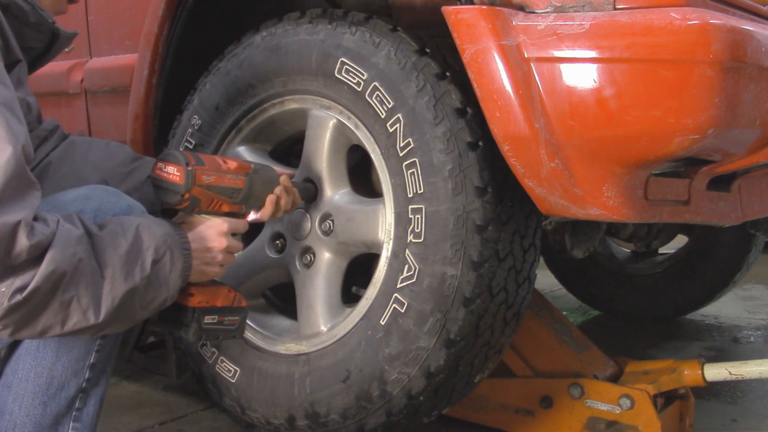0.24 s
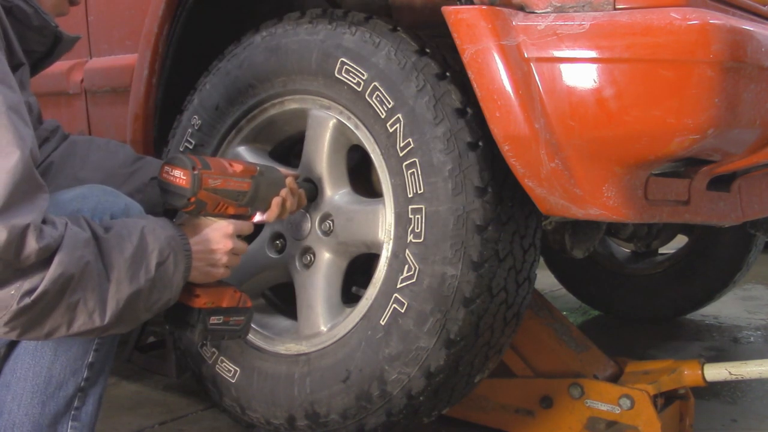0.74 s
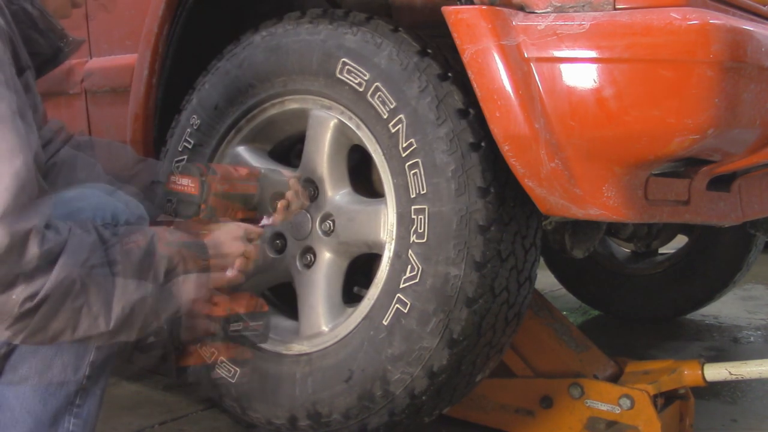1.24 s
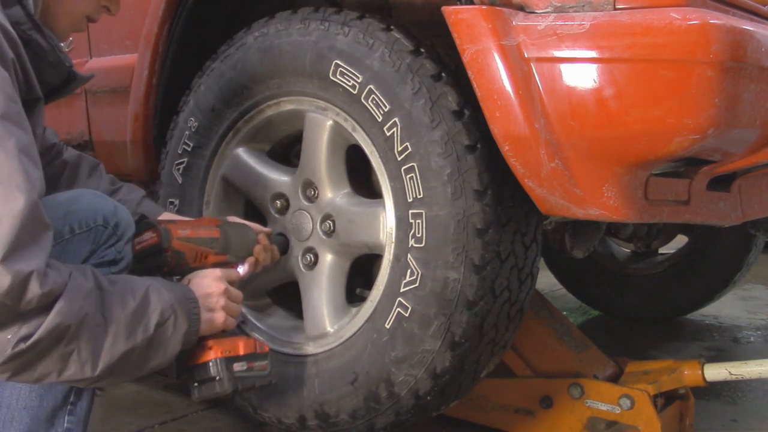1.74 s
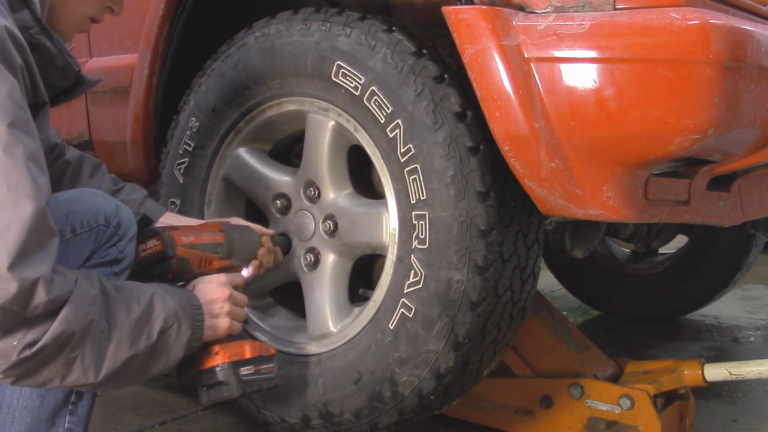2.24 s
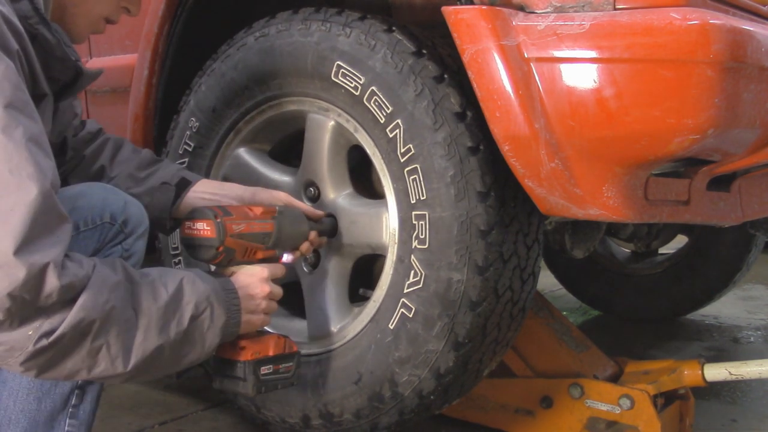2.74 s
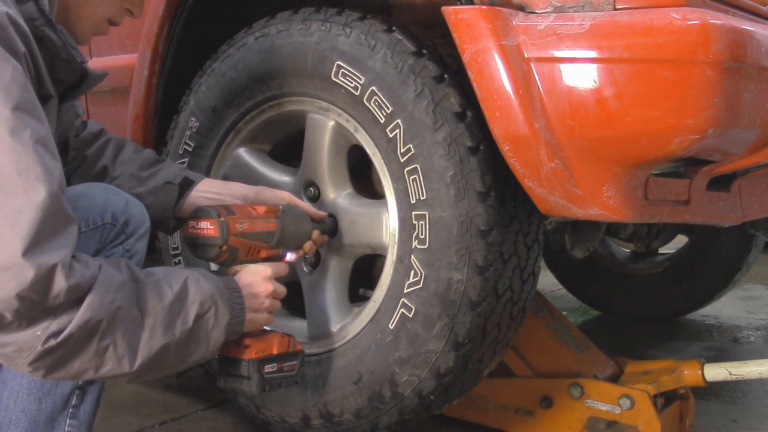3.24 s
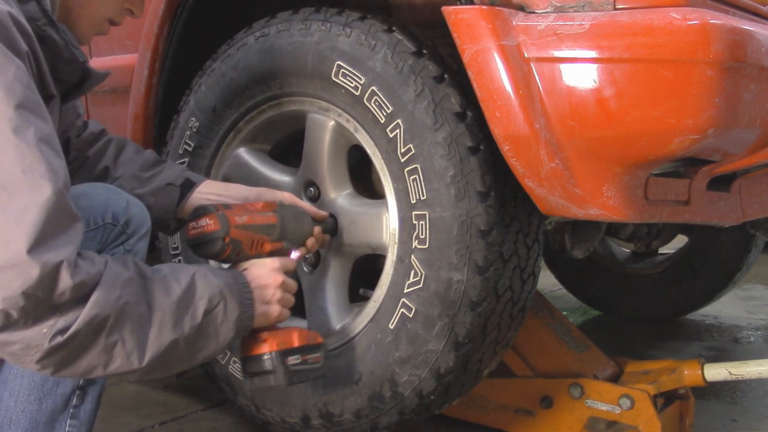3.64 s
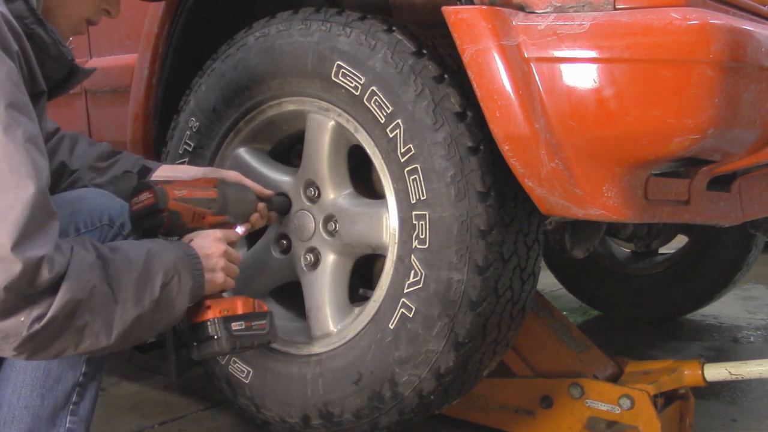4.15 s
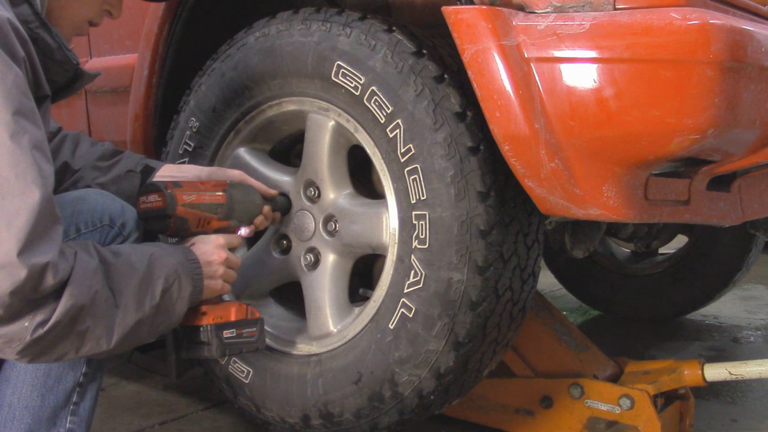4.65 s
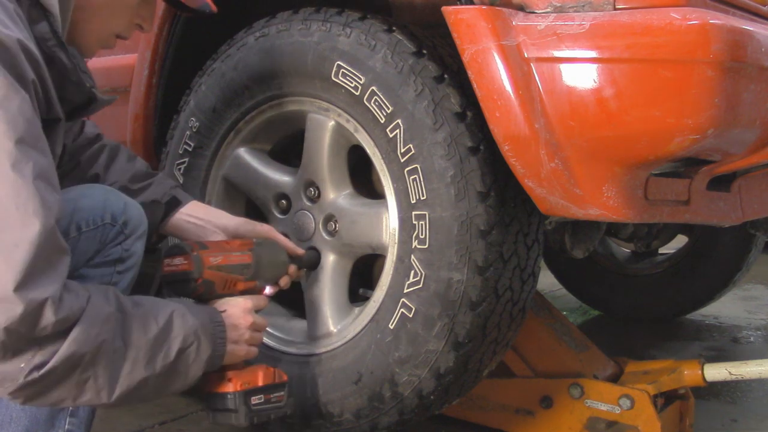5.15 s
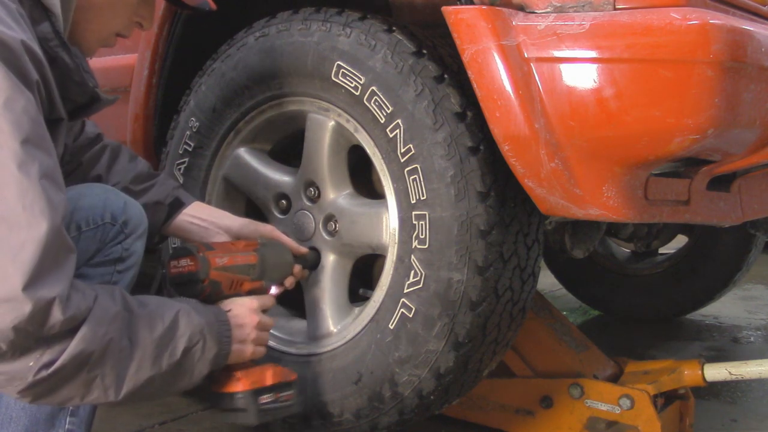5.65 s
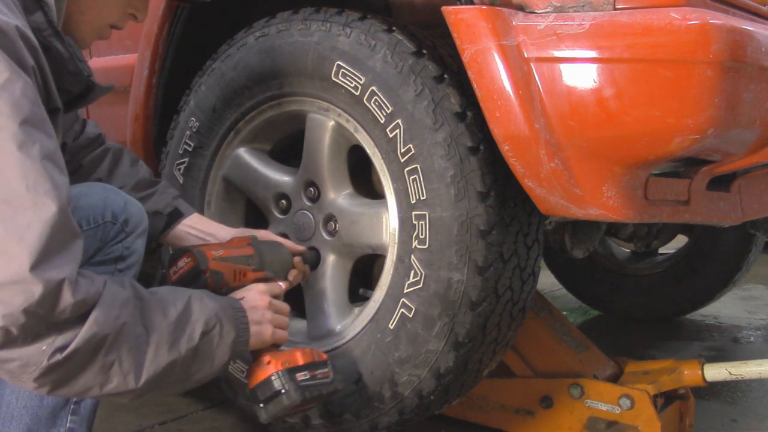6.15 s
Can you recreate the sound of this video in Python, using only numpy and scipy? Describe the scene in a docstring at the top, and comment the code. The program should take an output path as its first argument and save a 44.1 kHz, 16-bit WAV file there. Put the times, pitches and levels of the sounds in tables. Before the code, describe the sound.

In a reverberant garage, a cordless impact wrench runs close to the microphone in short pulls. Its rattling gear whine rises and drops with a thin high electronic whistle, then the hammer cracks several uneven steel blows as each lug nut seats. Dull bumps against the wheel fall between pulls. The blows are loud and slightly squashed, with the room's ring swelling up behind them.

```python
"""The hush of a hard-walled garage and the dying ring of an earlier burst come first, then a cordless impact wrench
spins lug nuts onto a wheel in short pulls of the trigger. Its gears whine and rattle with motor speed, the speed
controller whistles near 10 kHz, and the hammer strikes a few uneven blows as each nut seats: puffs of noise through
steel resonances. Direct sound and garage reflections meet at the microphone, and the recorder's limiter ducks the
blows, so the garage's ring swells up behind each burst."""
import sys
import numpy as np
from scipy import signal
from scipy.fft import rfft, irfft
from scipy.io import wavfile
from scipy.ndimage import uniform_filter1d

SR = 44100
rng = np.random.default_rng(int(sys.argv[2]) if len(sys.argv) > 2 else 0)


def materialize(psi):
    """Save the field psi as 16-bit PCM at rate SR to the path in sys.argv[1].

    A 1-D psi becomes a single channel; in a 2-D psi each row is a channel.
    """
    bounded = np.clip(np.atleast_2d(psi).T, -1, 1)
    quanta = np.round(bounded * 32767).astype(np.int16)
    wavfile.write(sys.argv[1], SR, quanta)


N = 282227
SECONDS = np.arange(N) / SR

# hammer blows on the anvil: (time [s], strength [dB])
BLOWS = [(1.079, -9), (1.092, -7), (1.108, 1), (1.166, -7), (1.202, -0.5), (1.236, -0.5), (2.303, -10),
         (2.309, -8), (2.345, 3.5), (2.368, -4.5), (2.398, 0.5), (2.430, 6), (2.458, 1), (3.677, 1),
         (3.709, -0.5), (3.737, 7), (4.196, 2.5), (4.219, -2), (4.236, 5.5), (4.741, 3), (4.755, 5),
         (4.798, 4), (4.810, 10), (4.867, 9), (5.603, -5), (5.617, 9), (5.923, -14), (5.928, -15),
         (5.957, 8.5)]
# colour of anvil, socket and wheel: (frequency [Hz], relative power density [dB])
STEEL_SPECTRUM = [(88, -56.5), (150, -15), (253, -23), (339, -11), (471, -12), (583, -6.5), (643, -7),
                  (1130, -4.5), (1290, -5.5), (2100, -1), (3280, -2.5), (4480, -6.5), (7860, -8.5),
                  (15500, -29)]
# dull colour of nut, thread and shaken wheel: (frequency [Hz], relative power density [dB])
THREAD_SPECTRUM = [(50, 3), (90, 0.5), (170, 8.5), (300, 1.5), (700, -3.5), (1500, -46.5)]


def from_db(db):
    """Decibels to amplitude gain."""
    return 10 ** (np.asarray(db) / 20)


def rms_one(x):
    """The same signal at rms 1."""
    return x / np.sqrt(np.mean(x ** 2) + 1e-20)


def in_time(rows):
    """Each column of a curve, interpolated at every sample."""
    s, *columns = np.transpose(rows)
    return [np.interp(SECONDS, s, c) for c in columns]


def at_hz(points, hz):
    """A table read on a log-frequency axis."""
    f, value = np.transpose(points)
    return np.interp(np.log(np.maximum(hz, 1)), np.log(f), value)


def drift(rate_hz):
    """Slow random wander of spread 1: noise through a two-pole low-pass, made at every 20th sample."""
    r = np.exp(-40 * np.pi * rate_hz / SR)
    noise = rng.standard_normal(N // 20 + 2002)
    slow = signal.lfilter([1], [1, -2 * r, r * r], noise)[2000:]   # drop the settling
    return np.interp(np.arange(N) / 20, np.arange(len(slow)), rms_one(slow))


def coloured(x, spectrum):
    """Causal (minimum-phase) filter with the given spectrum and unit power gain."""
    size = 4096
    gain = rms_one(from_db(at_hz(spectrum, np.arange(size // 2 + 1) * SR / size)))
    # folding the cepstrum forward in time gives minimum phase
    cepstrum = irfft(np.log(gain))
    cepstrum[1:size // 2] *= 2
    cepstrum[size // 2 + 1:] = 0
    impulse = irfft(np.exp(rfft(cepstrum)))
    return signal.oaconvolve(x, impulse)[:N]


def noise_of(spectrum):
    """Steady noise of the given colour."""
    return coloured(rng.standard_normal(N), spectrum)


def resonate(x, modes):
    """Adds a body's resonances to the sound passing through it."""
    out = x
    for hz, width_hz, db in modes:
        r = np.exp(-np.pi * width_hz / SR)
        zeros = [(1 - r * r) / 2, 0, (r * r - 1) / 2]
        poles = [1, -2 * r * np.cos(2 * np.pi * hz / SR), r * r]
        out = out + from_db(db) * signal.lfilter(zeros, poles, x + 1e-18)
    return out


def kicks(rows):
    """One sharp push for each (time [s], strength [dB]) row."""
    out = np.full(N, 1e-18)
    for s, db in rows:
        out[int(s * SR)] += from_db(db)
    return out


def bursts(rows, decay_s):
    """A dying puff of noise for each (time [s], strength [dB]) row."""
    envelope = signal.lfilter([1], [1, -np.exp(-1 / (decay_s * SR))], kicks(rows))
    return envelope * rng.standard_normal(N)


def steel(x):
    """Anvil, socket and wheel colour what passes through them, with their own resonances on top."""
    # resonances of socket, wheel and tyre cavity: (frequency [Hz], width [Hz], gain over surroundings [dB])
    socket_modes = [(201.6, 12, 10.5), (2550, 420, -16), (4440, 550, -4), (4760, 460, -1.5),
                    (5240, 460, -3.5), (7020, 1000, -1.5)]
    return resonate(coloured(x, STEEL_SPECTRUM), socket_modes)


def background():
    """The garage's steady hush, and the last of an earlier burst's ring, falling at a constant dB rate."""
    # the hush: (frequency [Hz], relative power density [dB])
    hush_spectrum = [(20, -7), (45, -6.5), (58, 5.5), (78, -10.5), (100, -4), (140, -17), (300, -12),
                     (1000, -11), (4000, -18.5), (8000, -27), (15000, -50)]
    hush_db, ring_db, ring_fall_db_per_s = -39.5, -33.5, 73
    fading = from_db(ring_db - ring_fall_db_per_s * SECONDS)
    return from_db(hush_db) * noise_of(hush_spectrum) + fading * noise_of(STEEL_SPECTRUM)


def garage(x, build_s=0.0028):
    """Diffuse reflections off hard walls build up, then die away band by band; the tail has unit energy."""
    # decay of the garage's ring: (frequency [Hz], time to fall 60 dB [s])
    ring_times = [(150, 0.69), (1000, 0.57), (2500, 0.6), (4400, 0.73), (6500, 0.5), (9000, 0.44),
                  (14000, 0.23)]
    t = np.arange(int(1.1 * SR)) / SR
    edges = np.geomspace(45, 17000, 19)
    tail = np.zeros(len(t))
    for low, high in zip(edges, edges[1:]):
        sos = signal.butter(2, [low, high], "band", fs=SR, output="sos")
        band = signal.sosfilt(sos, rng.standard_normal(len(t)))
        tail += band * from_db(-60 * t / at_hz(ring_times, np.sqrt(low * high)))
    tail *= 1 - np.exp(-t / build_s)
    return signal.fftconvolve(x, tail / np.sqrt(np.sum(tail ** 2)))[:N]


def wheel_bumps():
    """The tool bumps dully against the wheel: slow puffs of low noise."""
    # bumps: (time [s], strength [dB])
    bump_times = [(0.252, -16.5), (1.069, -11), (1.988, -13.5), (3.635, -16), (3.959, -9), (5.076, -16),
                  (5.919, -15)]
    return from_db(-10.5) * coloured(bursts(bump_times, decay_s=0.026), THREAD_SPECTRUM)


def socket_knock():
    """The socket drops onto a nut with a single dry clack of steel."""
    # clack: (time [s], strength [dB])
    knock_times = [(.259, -8.5)]
    return steel(bursts(knock_times, decay_s=0.0037))


def growl(grain_db=4.5):
    """The gears growl as a nut draws up tight: a short, coarse groan in the low mids."""
    # growl: (centre [s], length [s], level [dB])
    growl_times = [(3.625, 0.084, -21.5)]
    # its colour: (frequency [Hz], relative power density [dB])
    growl_spectrum = [(300, -34), (520, -14), (620, 3), (760, -7), (1000, -10), (2500, -40)]
    swell = sum(from_db(db) * np.exp(-(2 * (SECONDS - s) / length) ** 2) for s, length, db in growl_times)
    return swell * from_db(grain_db * drift(80)) * noise_of(growl_spectrum)


def binds(weigh, edge_s=0.043):
    """A soft-edged plateau for each time the nut binds, as high as weigh(level in dB)."""
    # the nut grinds on its thread: (start [s], length [s], level [dB])
    bind_times = [(1.063, 0.22, -40), (1.331, 0.236, -32.5), (1.657, 0.18, -23), (1.945, 0.077, -33.5),
                  (2.15, 0.29, -31), (3.623, 0.187, -26.5), (4.095, 0.91, -40.5), (5.533, .1, -57)]
    total = 0
    for s, length, db in bind_times:
        inside_s = np.minimum(SECONDS - s, s + length - SECONDS)
        total = total + weigh(db) * np.clip(inside_s / edge_s + .5, 0, 1)
    return total


def with_speed(rate, db, db_per_octave, working_hz=500):
    """Gain of a sound that grows steadily with every doubling of motor speed; db holds at working speed."""
    return from_db(db + db_per_octave * np.log2(rate / working_hz + 1e-9))


def nut_on_thread(rate, uneven_db=2.0):
    """A low rumble of the nut on its stud grows with speed and swells wherever the nut binds."""
    # the air in the tyre answers: (frequency [Hz], width [Hz], gain over surroundings [dB])
    tyre_modes = [(206, 18, 13)]
    rumble = from_db(uneven_db * drift(32)) * noise_of(THREAD_SPECTRUM)
    running_free = with_speed(rate, -55, db_per_octave=5) * resonate(rumble, tyre_modes)
    return binds(from_db) * rumble + running_free


def motor_motion(inertia_s=.03, full_trigger_db=-17):
    """Each pull follows its speed curve, then slows until the next; gives speed, gear and whistle levels."""
    # one curve per pull of the trigger, press to release: (time [s], commutation rate [Hz])
    speed_curves = [
        [(.13, 0), (.28, 275), (.575, 300), (.635, 465), (.72, 507), (1.06, 502), (1.1, 419.5), (1.29, 410.5),
         (1.36, 660), (1.405, 700), (1.5, 361)],
        [(1.595, -0.5), (1.67, 550.5), (1.73, 770), (1.79, 800), (1.85, 630), (1.94, 362), (2.02, 350),
         (2.24, 335), (2.35, 275)],
        [(2.68, 280.1), (2.8, 383.9), (2.9, 417.6), (3, 509.8), (3.08, 542.3), (3.58, 534.9), (3.64, 411),
         (3.74, 377.2)],
        [(3.92, 247.5), (4.07, 268.3), (4.13, 860.3), (4.225, 1059), (4.33, 899.5), (4.45, 695), (4.55, 589.8),
         (4.72, 512), (4.79, 445.7)],
        [(5.085, 300), (5.145, 800), (5.2, 994), (5.25, 1093), (5.33, 1135), (5.435, 1159), (5.5, 1055),
         (5.56, 937), (5.61, 751)],
        [(5.86, 0.5), (5.94, 328)],
        [(6.37, -6), (6.42, 124)],
    ]
    # the same pulls: (gear level [dB], whistle level [dB], time the trigger is fully home [s],
    # slowing after release [Hz per s]); a time home after the release changes nothing
    pull_settings = [(0, 0, 1.08, 4000), (1, -2, 2.35, 100), (0.5, 1.5, 3.72, 700), (0, 0, 6.9, 500),
                     (-5, -6, 5.12, 3600), (7, 2.5, 5.92, 4000), (4, 4, 6.45, 4000)]
    rate, gear_db, whistle_gain = np.zeros((3, N))
    for curve, (gears, whistle, home_s, slowing) in zip(speed_curves, pull_settings):
        pressed, released = curve[0][0], curve[-1][0]
        speed, = in_time(curve)
        slowed = speed - slowing * np.maximum(SECONDS - released, 0)
        rate = np.where(SECONDS >= pressed, np.maximum(slowed, 0), rate)
        gear_db[SECONDS >= pressed] = gears
        home = np.clip((SECONDS - home_s) / inertia_s, 0, 1)   # little chopping is left at full trigger
        held = (SECONDS >= pressed) * (SECONDS < released)
        whistle_gain += from_db(whistle + full_trigger_db * home) * held
    rate = np.maximum(uniform_filter1d(rate, size=int(inertia_s * SR)), 0)
    return rate, gear_db, uniform_filter1d(whistle_gain, size=800)


def chopping(rate, idle=.13, waver_db=1.65, full_speed_hz=1160, half_speed_db=-31):
    """The controller chops the current hardest at half speed, and little at full speed."""
    duty = np.clip(rate / full_speed_hz, 0, 1)
    amount = idle + (1 - idle) * np.sin(np.pi * duty) ** 2
    return from_db(half_speed_db + waver_db * drift(13)) * amount


def switching_tones(turns, rate, switching_hz=9871, light_load_db=7.5, light_hz=400):
    """Commutation splits the switching tone into sidebands, the lower one stronger at a light trigger."""
    # sidebands: (multiple of the commutation rate, relative level [dB])
    sidebands = [(-1, -5), (0, -19), (1, 5.5), (4, -18)]
    carrier = switching_hz * SECONDS
    light = np.clip((light_hz - rate) / 100, 0, 1)
    out = np.zeros(N)
    for k, db in sidebands:
        level_db = db + light_load_db * light * (k == -1)
        out += from_db(level_db) * np.sqrt(2) * np.sin(2 * np.pi * (carrier + k * turns + rng.random()))
    return out


def controller_whistle(turns, rate):
    """The chopped current whistles at its switching rate, with a fizz of noise reaching above it."""
    # fizz: (frequency [Hz], relative power density [dB])
    fizz_spectrum = [(7000, -40), (9500, -14), (10500, 0), (11500, 0), (12200, -8), (14300, -16),
                     (15500, -28)]
    return chopping(rate) * (switching_tones(turns, rate) + from_db(-9) * noise_of(fizz_spectrum))


def stator(rate, turns, strain, hz=2850, width_hz=300, surge_db=-9.5, steady_db=-20.5, strain_db=3,
           chirp_db=0.0, brisk_hz_per_s=3000, fade_hz=900):
    """The motor's frame rings at one pitch, most when speeding up or straining; sweeping tones make it chirp."""
    # magnetic hum: (multiple of the commutation rate, relative level [dB])
    magnetic_tones = [(4, 13.5), (7, -20), (8.2, 6.5), (10.1, 4)]
    acceleration = uniform_filter1d(np.gradient(rate) * SR, size=1500)
    speeding = np.clip(acceleration / brisk_hz_per_s, 0, 1)
    surge = np.sqrt(speeding) * np.clip(2 - 2 * rate / fade_hz, 0, 1)
    band = signal.butter(2, [hz - width_hz / 2, hz + width_hz / 2], "band", fs=SR, output="sos")
    hum = sum(from_db(db) * np.sqrt(2) * np.sin(2 * np.pi * multiple * turns)
              for multiple, db in magnetic_tones)
    noise_ring = rms_one(signal.sosfilt(band, rng.standard_normal(N)))
    ring = noise_ring + from_db(chirp_db) * signal.sosfilt(band, hum)
    return (from_db(surge_db) * surge + from_db(steady_db + strain_db * strain)) * ring


def gear_whine(turns, rate, flutter_db=4.5, swing_db=4.5, low_hz=500, loaded_hz=540, free_hz=900):
    """Tooth-mesh tones follow the motor; gear play smears the rough ones, which swell once per socket turn."""
    # tones: (multiple of the commutation rate, level under load [dB], level running free [dB], roughness)
    mesh_tones = [(1.13, -16, -12, 0.81), (2, -23.5, -33, 0), (2.27, -14.5, -18.5, 0.63),
                  (2.42, -35, -20, 1.15), (3, -18.5, -36, 0.17), (3.26, -13.5, -5.5, 0.14),
                  (3.5, -23.5, -18, 0.9), (4, -25.5, -17.5, 0.1), (4.541, -23.5, -19, 0.86),
                  (5, -20, -25, 0.3), (5.5, -22.5, -20, 0.3), (6.52, -34, -17, 0.3), (6.8, -16.5, -19.5, 1)]
    # gear case resonances: (frequency [Hz], width [Hz], gain over surroundings [dB])
    case_modes = [(1740, 130, -0.89), (2250, 220, 1), (2780, 460, -4.1)]
    free = np.clip((rate - loaded_hz) / (free_hz - loaded_hz), 0, 1)
    out = np.zeros(N)
    for multiple, loaded_db, free_db, rough in mesh_tones:
        radiated = 1 / np.sqrt(1 + (low_hz / (multiple * rate + 1)) ** 4)   # low tones radiate poorly
        swell_db = swing_db * rough * np.sin(2 * np.pi * (turns / 46 + rng.random()))
        wander_db = flutter_db * (.5 + .5 * rough) * drift(40)
        level_db = loaded_db + free * (free_db - loaded_db) + swell_db + wander_db
        phase = 2 * np.pi * multiple * turns + 2 * rough * drift(30)
        out += from_db(level_db) * radiated * np.sqrt(2) * np.sin(phase)
    driven = np.clip(rate / 480, 0, 1) ** 0.59   # slow gears whine less
    return driven * resonate(out, case_modes)


def gear_rattle(turns, rate, beat=0.52, grain_db=2.5, slow_hz=560, fast_hz=1000):
    """Teeth clatter in step with the motor; at full speed the fan's duller rush takes over."""
    # slow clatter, then fast rush: (frequency [Hz], relative power density [dB])
    clatter_spectrum = [(150, -77), (250, -45), (482, -15), (593, -11.5), (945, -8.5), (1200, -3.5),
                        (1510, -1.5), (1760, -3.5), (2620, -1.5), (2850, 4), (3760, -3.5), (5040, -2.5),
                        (9890, -15.5), (10800, -13), (15500, -48.5)]
    rush_spectrum = [(150, -64), (250, -31), (282, -24.5), (544, -18), (1200, -5), (1950, -11.5),
                     (2620, -10), (3330, -6), (3630, -7.5), (3960, -12.5), (7380, -16), (8470, -22),
                     (15500, -39)]
    teeth = (1 + beat * np.cos(2 * np.pi * turns)) * from_db(grain_db * np.clip(drift(86), -2, 2))
    fast = np.clip((rate - slow_hz) / (fast_hz - slow_hz), 0, 1)
    clatter = coloured(rms_one(teeth * rng.standard_normal(N)), clatter_spectrum)
    rush = noise_of(rush_spectrum)
    return from_db(-4.0) * np.sqrt(1 - fast) * clatter + from_db(-4.5) * np.sqrt(fast) * rush


def wrench_motor(turns, rate, gear_db):
    """Gears heard through the tool's housing, and the ringing motor frame, both louder with speed."""
    # housing resonances: (frequency [Hz], width [Hz], gain over surroundings [dB])
    housing_modes = [(1234, 130, -5.5), (2440, 290, -20)]
    strain = binds(np.ones_like)
    gears = resonate(from_db(-2.0) * gear_whine(turns, rate) + gear_rattle(turns, rate), housing_modes)
    frame = stator(rate, turns, strain)
    return from_db(gear_db) * (with_speed(rate, -15.5, db_per_octave=9) * gears
                               + with_speed(rate, -14.5, db_per_octave=5.5) * frame)


def cam_clatter(wind_up_s=0.024, settle_s=.025, level_db=-18, grain_db=7.5, follows=0.54):
    """The hammer's cam clatters unevenly as it winds up to each blow, and settles after it."""
    swells = [from_db(follows * db) * np.exp(np.minimum((SECONDS - s) / wind_up_s, (s - SECONDS) / settle_s))
              for s, db in BLOWS]
    grain = from_db(level_db + grain_db * np.clip(drift(91), -2, 2))
    return np.max(swells, axis=0) * grain * noise_of(STEEL_SPECTRUM)


def hammer(rebound_s=.02, rebound_db=-18):
    """Each blow is a short steel crack; the loose socket bounces back once, weakly, after it."""
    rebounds = [(s + rebound_s * rng.uniform(.5, 1.5), db + rebound_db) for s, db in BLOWS]
    return from_db(2.5) * steel(bursts(BLOWS + rebounds, decay_s=0.0049))


def scene():
    """Direct sound of motor, nut and hammer at the microphone, with the garage's reflections and hush."""
    rate, gear_db, whistle_gain = motor_motion()
    turns = np.cumsum(rate) / SR   # commutation cycles so far
    motor = wrench_motor(turns, rate, gear_db)
    whistle = whistle_gain * controller_whistle(turns, rate)
    thread = nut_on_thread(rate) + growl()
    bumps = wheel_bumps()
    knock = socket_knock()
    cracks = hammer() + cam_clatter() + knock
    # into the room: each blow rings the steel and also shakes the whole wheel
    struck_steel = from_db(23) * steel(kicks(BLOWS))
    thuds = from_db(-1.0) * coloured(kicks(BLOWS), THREAD_SPECTRUM)
    running = from_db(-11.0) * (motor + thread + bumps)
    room = garage(running + from_db(-6) * knock + struck_steel + thuds)
    return (motor + whistle + thread + bumps + cracks + room + background())[None]


def limiter(x, threshold_db=-5.5, treble=2.385, sense_s=0.0014, attack_s=0.0034, release_db_per_s=220):
    """The gain drops just after the level passes the threshold, sooner for treble, then climbs back."""
    def smooth(v, seconds):
        """One-pole averaging."""
        r = np.exp(-1 / (seconds * SR))
        return signal.lfilter([1 - r], [1, -r], v)
    power = x ** 2 + (treble * np.diff(x, prepend=0)) ** 2
    over_db = np.maximum(10 * np.log10(smooth(power, sense_s) + 1e-12) - threshold_db, 0)
    # a running maximum on a rising ramp holds peaks that fall at the release rate
    ramp = release_db_per_s * SECONDS
    held_db = np.maximum.accumulate(over_db + ramp, axis=-1) - ramp
    return x * from_db(-smooth(held_db, attack_s))


def record(dry):
    """The front of each blow gets past the limiter and is rounded off; the top is cut."""
    ceiling, cutoff_hz = .88, 15600
    x = limiter(dry)
    rounded = x / (1 + (x / ceiling) ** 6) ** (1 / 6)
    return signal.sosfilt(signal.ellip(10, .1, 70, cutoff_hz, fs=SR, output="sos"), rounded)


dry = scene()
out = record(dry)
materialize(out)
```